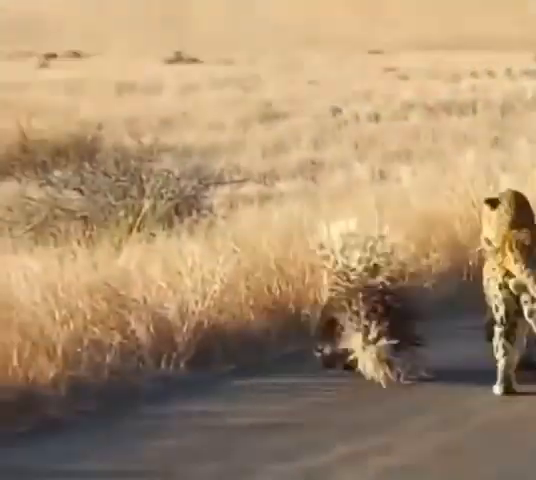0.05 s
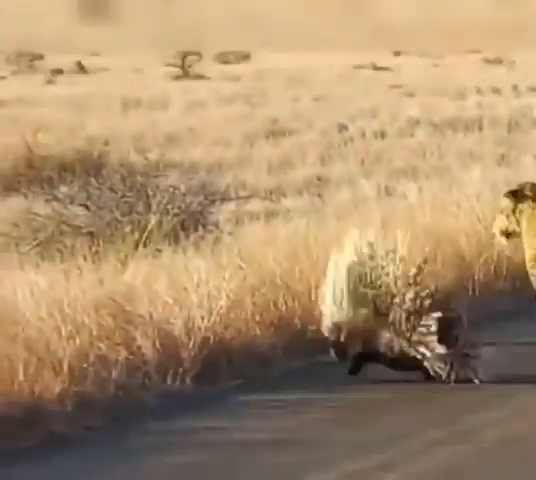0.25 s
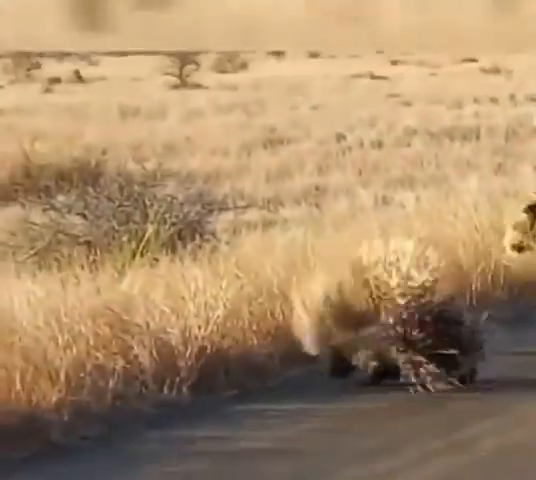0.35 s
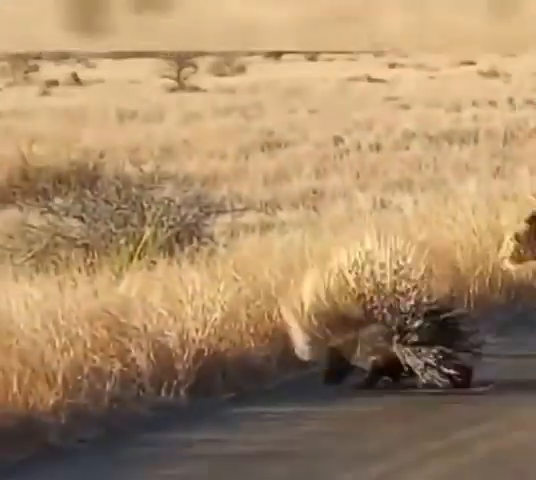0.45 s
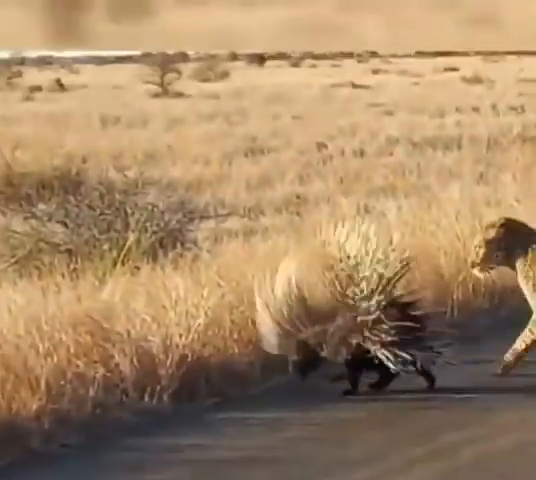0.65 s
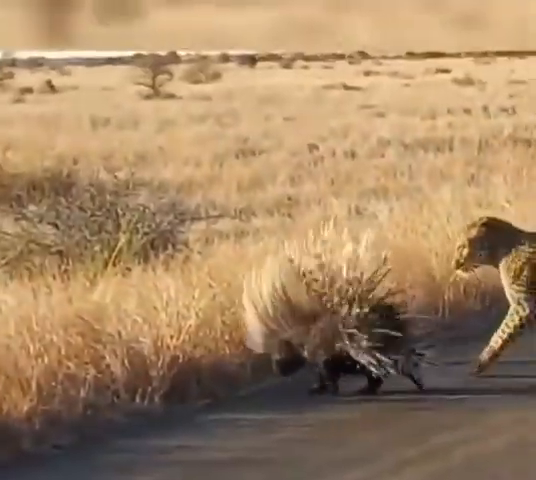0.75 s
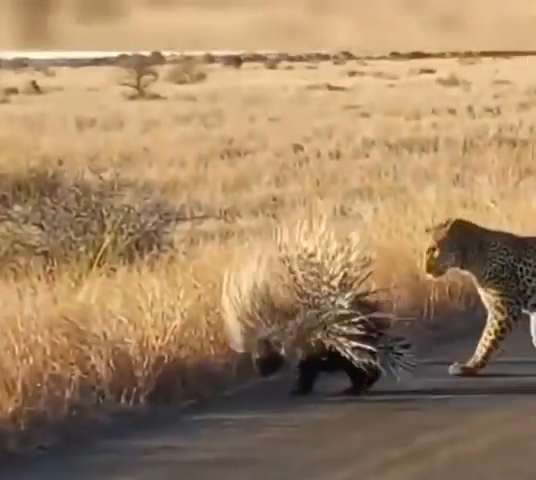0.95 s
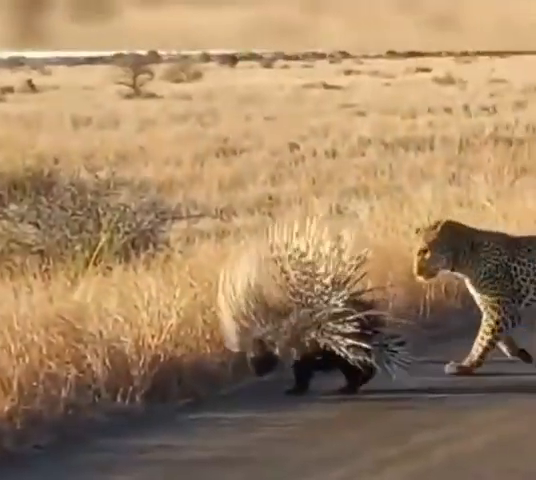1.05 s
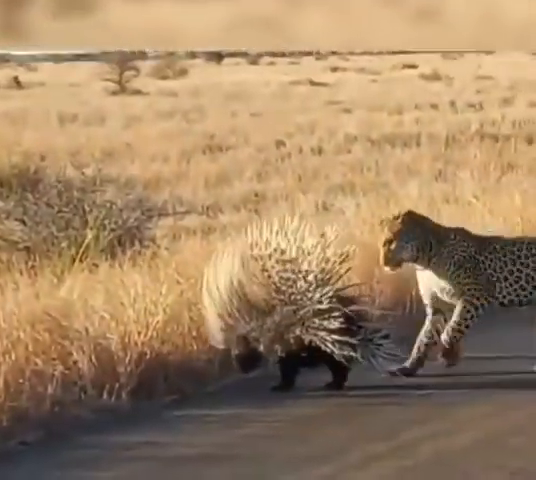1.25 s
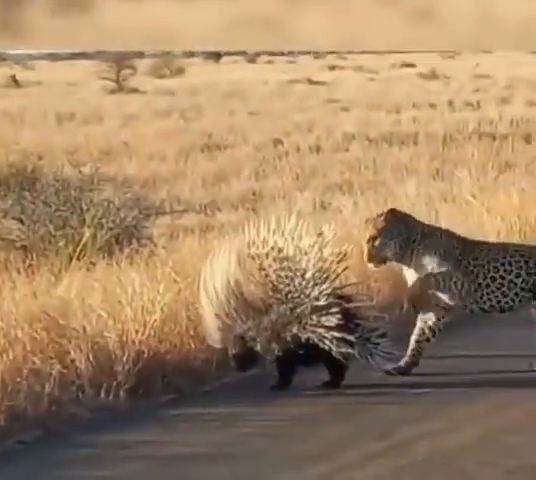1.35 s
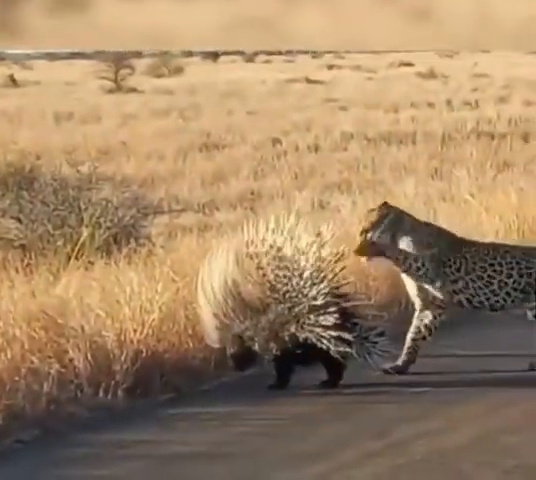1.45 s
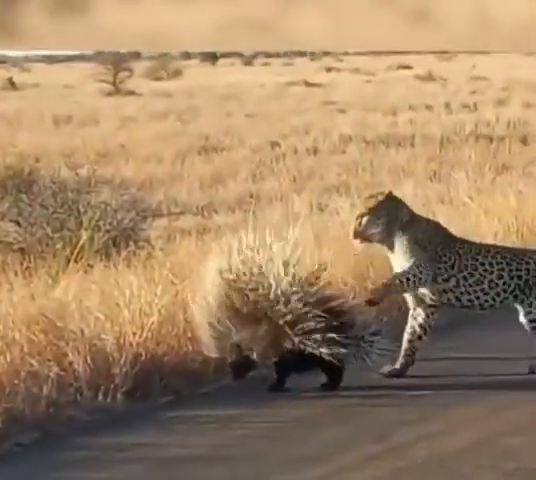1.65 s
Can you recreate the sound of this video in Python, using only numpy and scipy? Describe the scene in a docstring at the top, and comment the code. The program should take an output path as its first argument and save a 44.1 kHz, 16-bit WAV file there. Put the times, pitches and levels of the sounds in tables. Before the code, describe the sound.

Porcupine quills shake with a dry rattle and hiss, fading to faint outdoor air.

```python
"""A burst of dry rattling and hissing: a porcupine whirls round on a grassland road, shaking its quills.
Hundreds of hollow quills tap each other, bunches of them clack, and their shafts hiss as they slide.
Dull thumps and scuffs of the turning body come with the hardest shaking. The last quills tick into
place, leaving faint outdoor air and one distant, bird-like whistle."""
import sys
import numpy as np
from scipy import signal
from scipy.fft import rfft, irfft
from scipy.io import wavfile
from scipy.ndimage import uniform_filter1d

SR = 44100
rng = np.random.default_rng(int(sys.argv[2]) if len(sys.argv) > 2 else 0)


def dump_mix(stems):
    """Bounce the given channels to the path in sys.argv[1] as a 16-bit WAV at rate SR."""
    frames = np.atleast_2d(stems).T  # one column per channel
    limited = np.clip(frames, -1, 1)  # hard clip at full scale
    pcm = np.round(limited * 32767).astype(np.int16)
    wavfile.write(sys.argv[1], SR, pcm)


N = 74970

QUILL_LOW_HZ, QUILL_HIGH_HZ = 622.7, 5326.7  # the range in which a quill rings
BRIGHT_SLOPE = 0.071  # harder knocks are brighter: extra dB of treble for each dB of level
TOP_HZ = 13450  # the microphone cuts the treble above this


def undb(db):
    """Turn decibels into a number to multiply a sound by."""
    return 10 ** (np.asarray(db) / 20)


def unit(x):
    """Scale a signal so that its average size (rms) is 1."""
    return x / np.sqrt(np.mean(x ** 2))


def fade(age, t60):
    """A dying-away curve that drops by 60 dB every t60 seconds."""
    return undb(-60 * age / t60)


def follow(curve):
    """Join (time, level) points into a gain for every sample."""
    times, db = np.array(curve).T
    return undb(np.interp(np.arange(N) / SR, times, db))


def flicker(per_s):
    """A smooth random wobble of size 1 that takes a new value per_s times a second."""
    step = int(SR / per_s)
    stairs = np.repeat(rng.standard_normal(N // step + 2), step)
    return unit(uniform_filter1d(stairs, step)[rng.integers(step):][:N])


def colour(x, points, size=4096):
    """Make some pitches louder and others softer, following (frequency, level) points."""
    hz, db = np.array(points).T
    freqs = np.maximum(np.arange(size // 2 + 1) * SR / size, 1)
    gains = undb(np.interp(np.log(freqs), np.log(hz), db))
    # fold the filter so that it rings only after a sound, never before it
    cepstrum = irfft(np.log(gains))
    cepstrum[1:size // 2] *= 2
    cepstrum[size // 2 + 1:] = 0
    return signal.fftconvolve(x, irfft(np.exp(rfft(cepstrum))))[:len(x)]


def add(track, start_s, sound):
    """Mix a sound into a track at the given time."""
    i = int(np.clip(start_s * SR, 0, N - 1))
    track[i:i + len(sound)] += sound[:N - i]


def quill_rings(knock_hz, width_oct, size=900, tones=7):
    """One row per knock: a quill rings with a few short tones, strongest near the pitch of the knock."""
    age, count = np.arange(size) / SR, len(knock_hz)
    places = (np.arange(tones) + rng.random((count, tones))) / tones
    hz = QUILL_LOW_HZ + (QUILL_HIGH_HZ - QUILL_LOW_HZ) * places
    octaves_away = np.log2(hz / knock_hz[:, None])
    gains = rng.choice([-1., 1.], (count, tones)) * np.exp(-.5 * (octaves_away / width_oct) ** 2)
    gains /= np.linalg.norm(gains, axis=1, keepdims=True)
    t60 = 0.00955 * 2 ** (.6 * rng.standard_normal((count, 1)))  # loosely held quills ring longer
    return sum(gains[:, [k]] * np.sin(2 * np.pi * hz[:, [k]] * age) for k in range(tones)) * fade(age, t60)


def coat(x, ring_width_hz=10):
    """The coat of quills colours every knock and rings on briefly at a few pitches."""
    # tone colour of the coat: f/Hz, level/dB
    coat_colour = [(300, -36), (750, -25), (1000, -8.5), (1190, -1), (1350, -3), (1600, -2.5), (1900, 0.5),
                   (2100, -4.5), (2320, 0.5), (2650, -3.5), (3100, -5.5), (3600, -12), (4150, -13),
                   (5200, -20), (8000, -23)]
    # pitches at which the whole coat rings: f/Hz, level/dB
    coat_rings = [(1200, -8), (1755, -6.5), (1960, -6.5), (2345, -1.5), (2555, -3)]
    x = colour(x, coat_colour)
    return x + sum(undb(db) * signal.lfilter(*signal.iirpeak(hz, hz / ring_width_hz, fs=SR), x)
                   for hz, db in coat_rings)


def taps(per_s=1350, scatter_db=1, treble_hz=2870, bright_from_db=-34):
    """Quills knock against each other at random, louder and brighter the harder the coat is shaken."""
    # force of the shaking, as the loudness of the taps: t/s, level/dB
    shaking = [(0, -38.5), (.08, -39), (.11, -42), (.155, -36.5), (.24, -16), (.295, -18.5), (.37, -13.5),
               (.47, -11), (.535, -14.5), (.6, -16.5), (.64, -20), (.75, -27), (.775, -31), (.82, -34.5),
               (.88, -40), (.925, -42.5), (.98, -46), (1.08, -54), (1.16, -63)]
    count = int(per_s * N / SR)
    times = (np.arange(count) + 2 * rng.random(count)) / per_s
    strengths = undb(scatter_db * np.clip(rng.standard_normal(count), -2, 1))
    rings = quill_rings(rng.uniform(QUILL_LOW_HZ, QUILL_HIGH_HZ, count), width_oct=.45)
    rattle = np.zeros(N)
    for start, strength, ring in zip(times, strengths, rings):
        add(rattle, start, strength * ring)
    rattle, force = unit(coat(rattle)), follow(shaking)
    treble = signal.sosfiltfilt(signal.butter(4, treble_hz, "high", fs=SR, output="sos"), rattle)
    treble_gain = (force / undb(bright_from_db)) ** BRIGHT_SLOPE
    return force * (rattle + treble * (treble_gain - 1))


def reflections(x, t60=0.04, level_db=-10, size=4096):
    """Sound bounces off nearby surfaces, giving each tap a short tail."""
    tail = rng.standard_normal(size) * fade(np.arange(size) / SR, t60)
    return x + undb(level_db) * signal.fftconvolve(x, tail / np.linalg.norm(tail))[:N]


def hiss(scrapes_per_s=7000, scatter_db=1.5, bands=6, flicker_db=1.3, side_hz=10500, side_db=-14.5):
    """Shafts slide over each other in tiny scrapes that blur into a flickering hiss."""
    # loudness of the sliding: t/s, level/dB
    sliding = [(0, -47), (.15, -47.5), (.162, -33.5), (.195, -35.5), (.285, -22), (.38, -22.5), (.41, -26),
               (.51, -21), (.6, -26), (.68, -40.5), (.79, -49), (.85, -55.5), (1, -61.5), (1.15, -77)]
    # tone colour of the sliding shafts: f/Hz, level/dB
    shaft_colour = [(300, -18), (700, 1.5), (3000, -12.5), (5500, 2), (7000, 2), (8200, 2), (9900, 8),
                    (11600, -1.5), (12900, 4), (13500, 1.5)]
    # sharp flicks of one shaft over another: t/s, level/dB
    flicks = [(0.126, -37.5), (.158, -38), (0.499, -28.5), (0.509, -21.5), (.527, -21), (0.580, -23),
              (.785, -42)]
    scrapes = (rng.random(N) < scrapes_per_s / SR) * rng.choice([-1, 1], N)
    strengths = undb(scatter_db * rng.standard_normal(N))
    spectrum = rfft(colour(scrapes * strengths, shaft_colour))
    # each band of pitches flickers on its own
    band = np.minimum(np.linspace(0, SR / 2, len(spectrum)) * bands // TOP_HZ, bands - 1)
    middle = unit(sum(irfft(spectrum * (band == k), N) * undb(flicker_db * flicker(per_s=60))
                      for k in range(bands)))
    # high noise, added on the left and taken away on the right, makes the top a little wide
    side = signal.sosfilt(signal.butter(6, side_hz, "high", fs=SR, output="sos"), rng.standard_normal(N))
    side = undb(side_db) * unit(colour(side, shaft_colour)) * np.array([[1], [-1]])
    gain = follow(sliding)
    for start, db in flicks:
        add(gain, start, undb(db) * fade(np.arange(N // 10) / SR, t60=0.022))
    return (middle + side) * gain


def air(level_db=-53.5):
    """Outdoor air makes a faint, steady, low noise."""
    # tone colour of the air: f/Hz, level/dB
    air_colour = [(18, -49.5), (41, -20), (54, -3), (107, 3), (145, -4.5), (200, -2.5), (400, -6.5),
                  (795, -13.5), (1500, -21.5), (2430, -24.5), (5910, -29), (13000, -26)]
    return unit(colour(rng.standard_normal(N), air_colour)) * undb(level_db)


def clacks(quills=4, spread_s=.005, snap_hz=3980, snap_width_hz=1100, snap_db=-15.5, size=2048):
    """A bunch of quills lands almost at once, and their hard tips start the clack with a dry snap."""
    # bunches that strike together, and the pitch of each knock: t/s, level/dB, f/Hz
    strikes = [(.008, -36.5, 1400), (0.047, -33.5, 1865), (0.088, -30.5, 1900), (0.174, -27.5, 2320),
               (.209, -18, 2500), (0.247, -16, 2100), (.265, -13.5, 2700), (0.338, -8, 1854),
               (0.344, -12, 1250), (.359, -11.5, 2000), (0.374, -6, 1800), (.398, -13, 3700),
               (0.426, -7.5, 2000), (0.431, -12, 2600), (.444, -9, 3600), (.452, -15, 1500),
               (.463, -5, 2090), (0.478, -9, 2700), (0.495, -10.5, 1900), (.511, -8, 2900),
               (0.522, -12, 2100), (.553, -14, 1800), (.561, -13, 1900), (0.571, -11, 1700),
               (.579, -12.5, 3700), (.591, -14.5, 2662), (.604, -9, 2000), (.611, -11.5, 2950),
               (0.641, -22.5, 1600), (.711, -24, 2300), (0.724, -23, 2600), (0.74, -22, 1600),
               (.760, -23, 2500), (.786, -22, 2700), (0.843, -32.5, 1700), (0.871, -30.5, 1766),
               (0.885, -34, 1900), (0.942, -38, 1840), (.966, -38, 2500), (.975, -35.5, 1620)]
    out, age = np.zeros(N), np.arange(size) / SR
    tips = signal.iirpeak(snap_hz, snap_hz / snap_width_hz, fs=SR)
    for start, db, hz in strikes:
        bunch = np.zeros(size)
        delays = spread_s * (np.arange(quills) + rng.random(quills) / 2) / quills
        for delay, ring in zip(delays, quill_rings(np.full(quills, hz), width_oct=0.4)):
            add(bunch, delay, ring)
        burst = rng.standard_normal(size) * fade(age, t60=0.0082)
        snap = signal.lfilter(*tips, signal.lfilter(*tips, burst))
        clack = unit(coat(bunch)) + undb(snap_db + BRIGHT_SLOPE * db) * unit(snap)
        # as much energy as a steady sound of this level lasting spread_s
        add(out, start, unit(clack) * undb(db) * np.sqrt(spread_s * SR / size))
    return out


def rustle(level_db=-27, hold_from_s=0.4203, hold_to_s=0.5193, slope_db_per_s=116, scuff_width_s=0.0067):
    """The moving coat makes a low rustle that swells, holds and fades; feet and coat add short scuffs."""
    # tone colour of the moving coat: f/Hz, level/dB
    rustle_colour = [(25, -22.5), (60, -7), (150, -0.5), (280, 0), (430, -4.5), (650, -2.5), (1000, 0.5),
                     (1500, -23)]
    # rough scuffs of the feet and coat: t/s, level/dB
    scuffs = [(0.311, -34), (0.371, -25.5), (.454, -24.5), (.505, -24.5), (.563, -28.5), (1.518, -56)]
    t = np.arange(N) / SR
    away_s = np.maximum(hold_from_s - t, 0) + np.maximum(t - hold_to_s, 0)
    swell = undb(level_db - slope_db_per_s * away_s)
    bumps = sum(undb(db) * np.exp(-.5 * ((t - peak_s) / scuff_width_s) ** 2) for peak_s, db in scuffs)
    return unit(colour(rng.standard_normal(N), rustle_colour)) * np.hypot(swell, bumps)


def thumps(attack_s=.004, pitch_scatter=0.0074):
    """The turning body makes dull thumps, each a few low tones that quickly die away."""
    # thumps of the body: t/s, level/dB
    hits = [(0.301, -26), (0.314, -23), (0.399, -24), (0.44, -22.5), (0.495, -24), (0.543, -28)]
    # tones in a thump: f/Hz, level/dB, time to fade by 60 dB/s
    thump_tones = [(75.5, -19, 0.06), (122, -11.5, 0.05), (163, 0, 0.21), (190, -4.5, 0.067),
                   (242.6, -2.5, 0.06), (297, 1.5, 0.026)]
    out, age = np.zeros(N), np.arange(N // 10) / SR
    for start, db in hits:
        ring = np.zeros(len(age))
        for hz, tone_db, t60 in thump_tones:
            pitch = hz * (1 + pitch_scatter * rng.standard_normal())
            ring += undb(tone_db) * fade(age, t60) * np.sin(2 * np.pi * (pitch * age + rng.random()))
        add(out, start, undb(db) * ring * (1 - np.exp(-age / attack_s)))
    return out


def ticks(pitch_scatter=0.0101):
    """The last quills drop into place one by one, free to ring a little longer."""
    # single quills settling back: t/s, level/dB
    landings = [(0.992, -43), (1.013, -41.5), (1.034, -45.5), (1.053, -45.5), (1.066, -44.5),
                (1.088, -50.5), (1.135, -54)]
    # tones of a settling quill: f/Hz, level/dB, time to fade by 60 dB/s
    tick_tones = [(1376, -8.5, 0.047), (1973, -8, 0.126), (2415, -4, 0.068), (2550, 2, 0.0413)]
    out, age = np.zeros(N), np.arange(N // 10) / SR
    for start, db in landings:
        for hz, tone_db, t60 in tick_tones:
            pitch = hz * (1 + pitch_scatter * rng.standard_normal())
            add(out, start, undb(db + tone_db) * fade(age, t60) * np.sin(2 * np.pi * pitch * age))
    return out


def whistle(start_s=1.63, length_s=0.0755, start_hz=2320, fall_hz_per_s=2500, level_db=-63.5):
    """One thin falling note from far away, like a bird's."""
    age = np.clip(np.arange(N) / SR - start_s, 0, length_s)
    cycles = np.cumsum(start_hz - fall_hz_per_s * age) / SR
    return undb(level_db) * np.sin(np.pi * age / length_s) * np.sin(2 * np.pi * cycles)


def scene():
    """The porcupine rattles straight ahead, over the quiet outdoor background."""
    knocks = reflections(taps() + clacks() + ticks())
    return knocks + hiss() + rustle() + thumps() + whistle() + air()


def record(dry):
    """The microphone rounds off the tallest peaks and cuts the highest treble."""
    ceiling = .88
    rounded = dry / (1 + (dry / ceiling) ** 6) ** (1 / 6)
    return signal.sosfilt(signal.ellip(10, .2, 80, TOP_HZ, fs=SR, output="sos"), rounded)


dry = scene()
out = record(dry)
dump_mix(out)
```